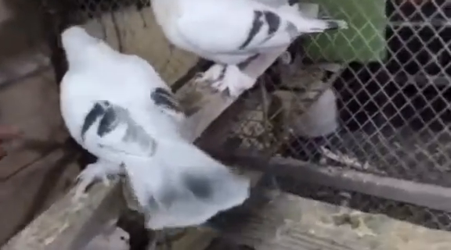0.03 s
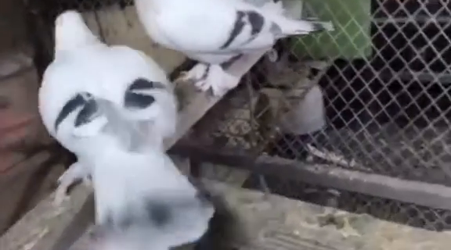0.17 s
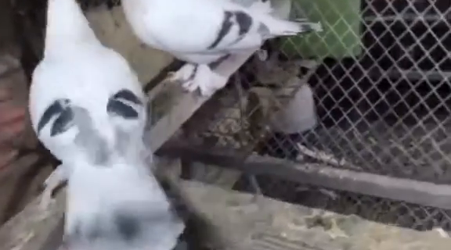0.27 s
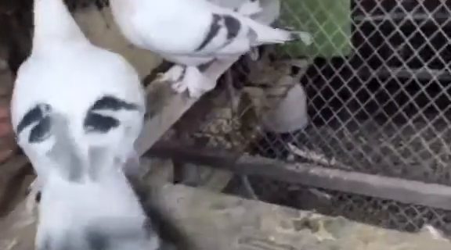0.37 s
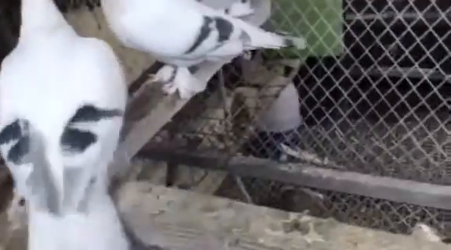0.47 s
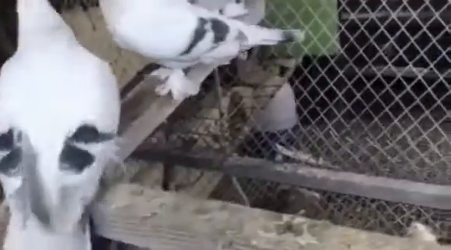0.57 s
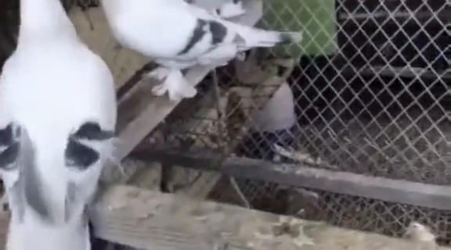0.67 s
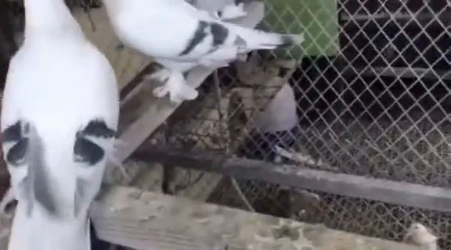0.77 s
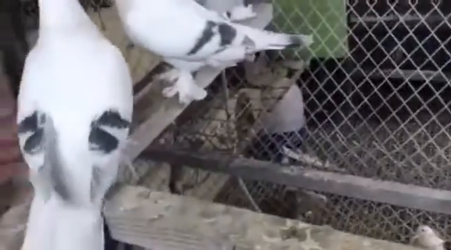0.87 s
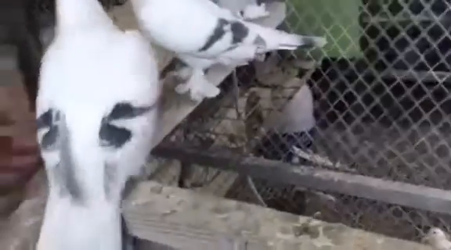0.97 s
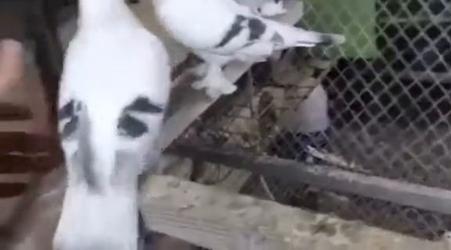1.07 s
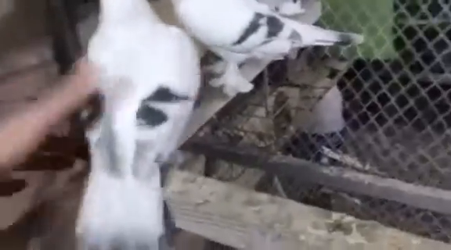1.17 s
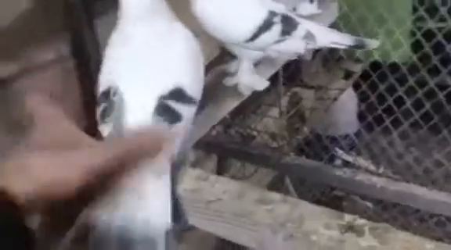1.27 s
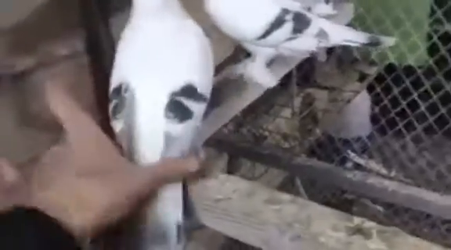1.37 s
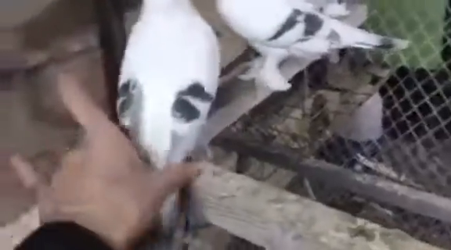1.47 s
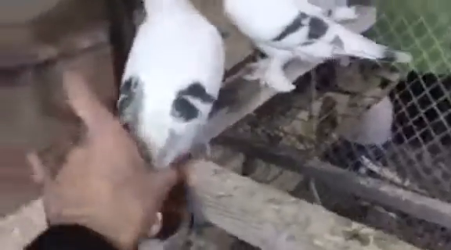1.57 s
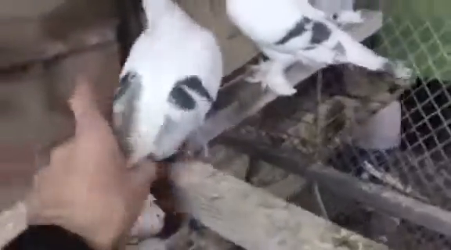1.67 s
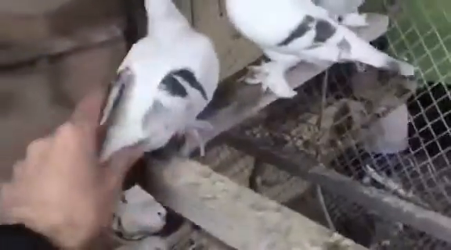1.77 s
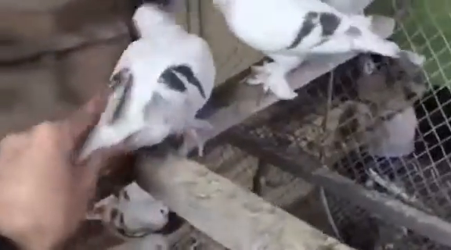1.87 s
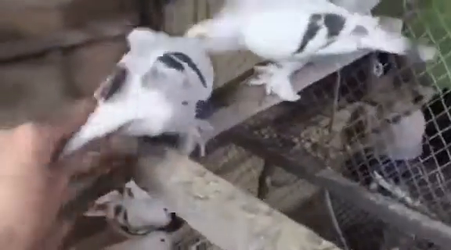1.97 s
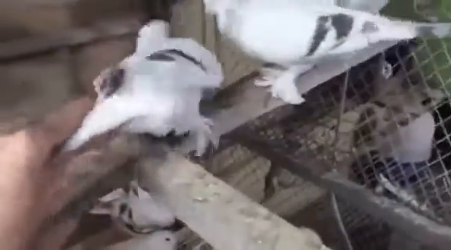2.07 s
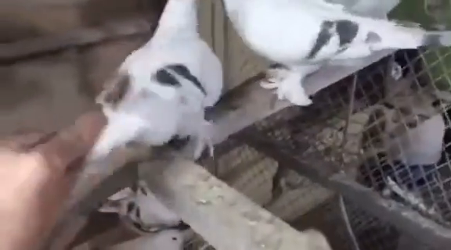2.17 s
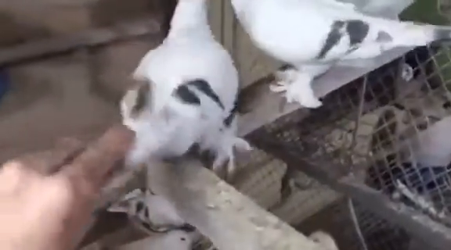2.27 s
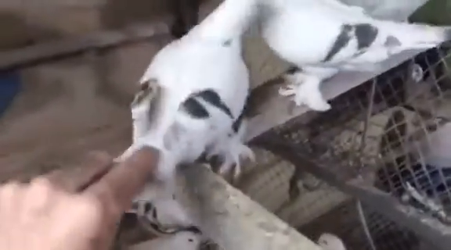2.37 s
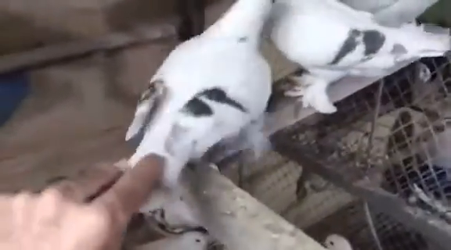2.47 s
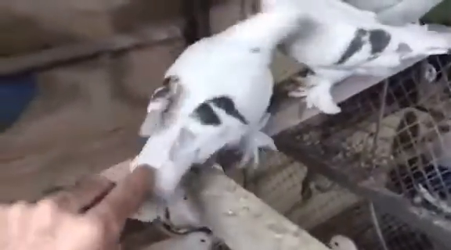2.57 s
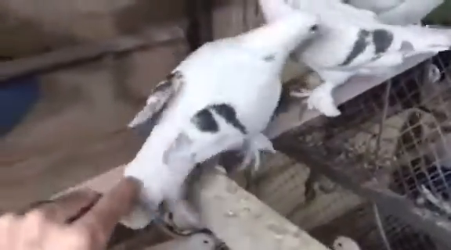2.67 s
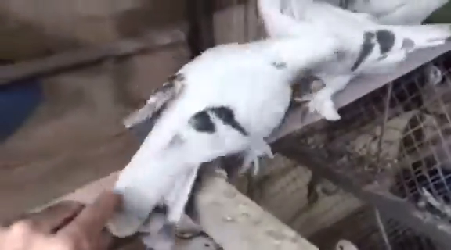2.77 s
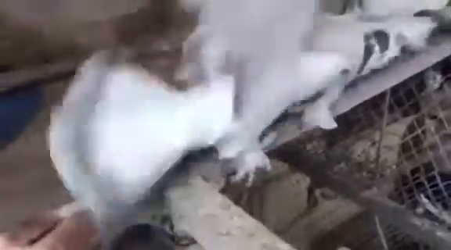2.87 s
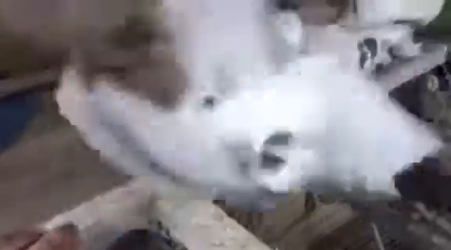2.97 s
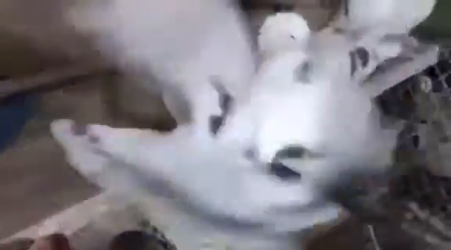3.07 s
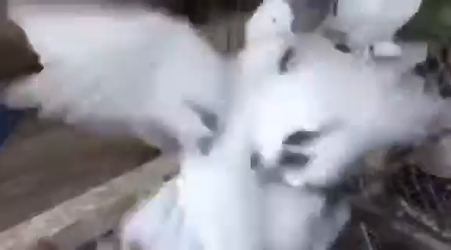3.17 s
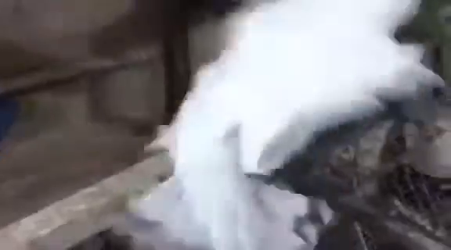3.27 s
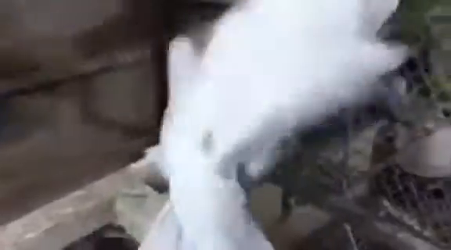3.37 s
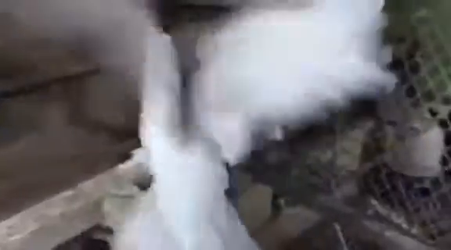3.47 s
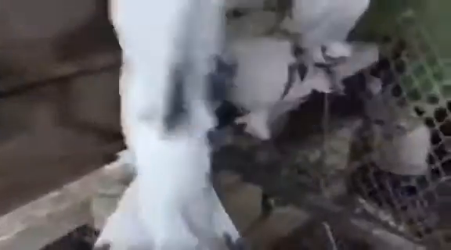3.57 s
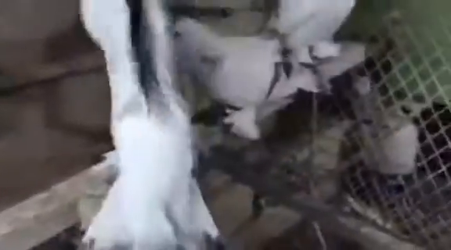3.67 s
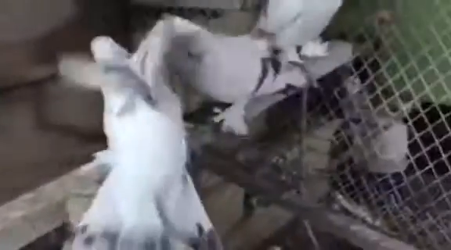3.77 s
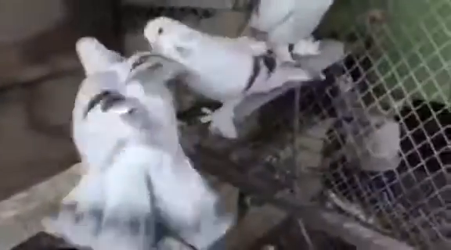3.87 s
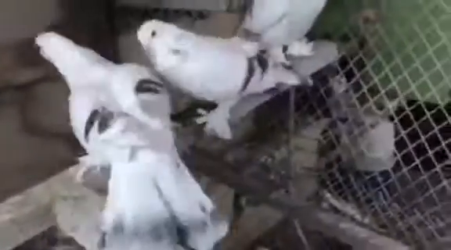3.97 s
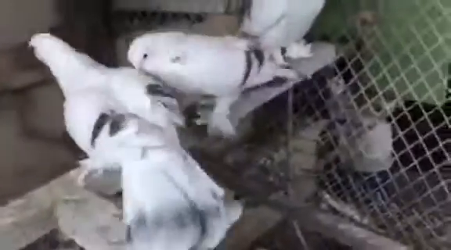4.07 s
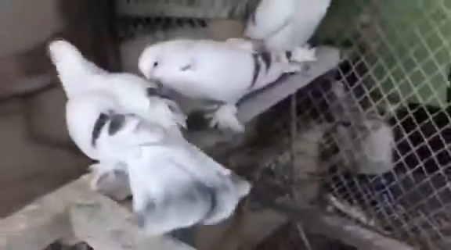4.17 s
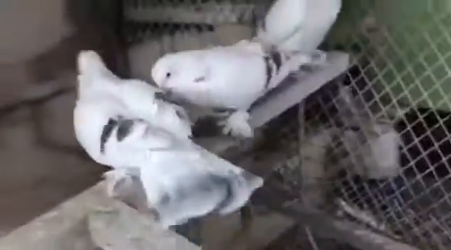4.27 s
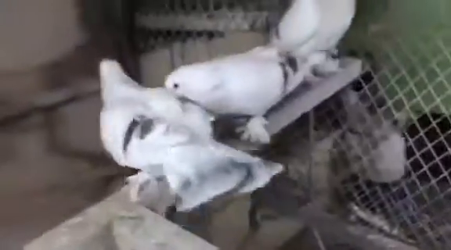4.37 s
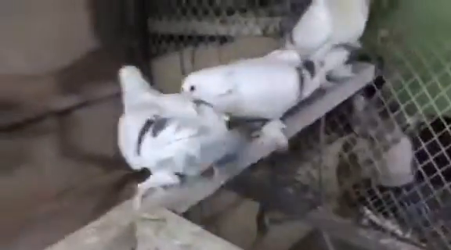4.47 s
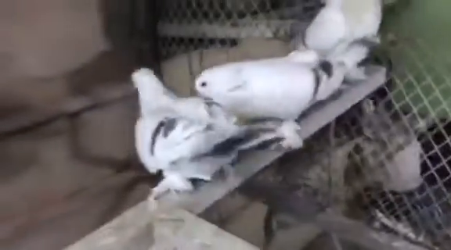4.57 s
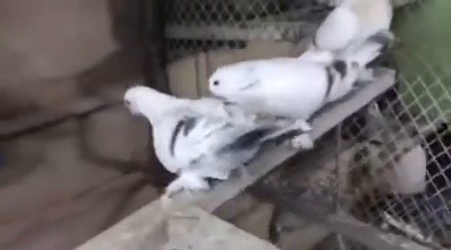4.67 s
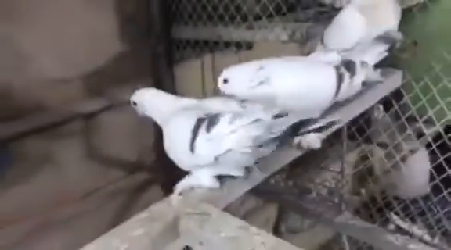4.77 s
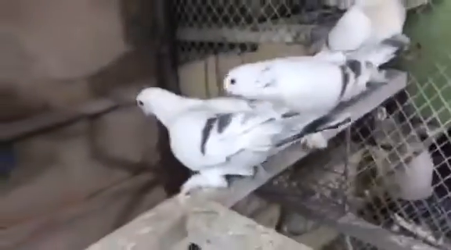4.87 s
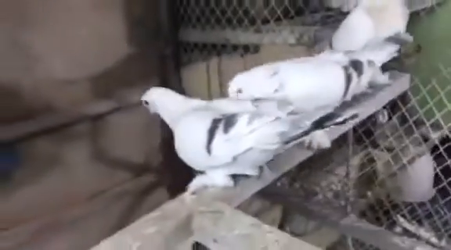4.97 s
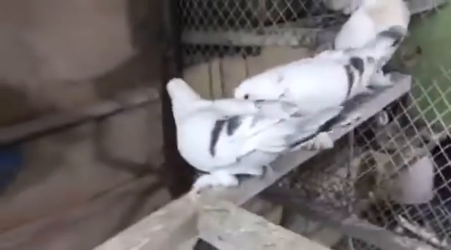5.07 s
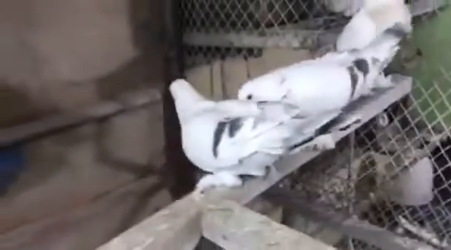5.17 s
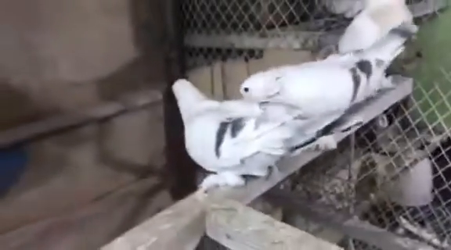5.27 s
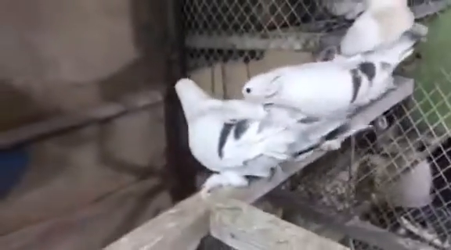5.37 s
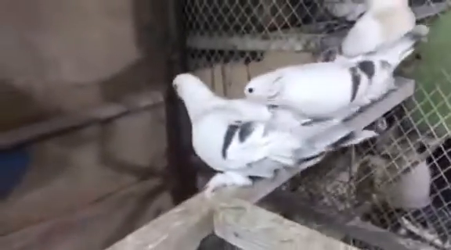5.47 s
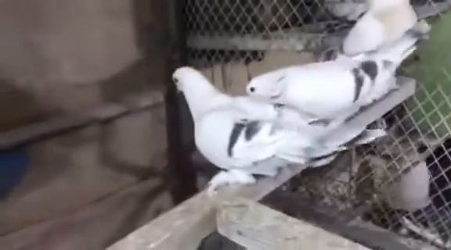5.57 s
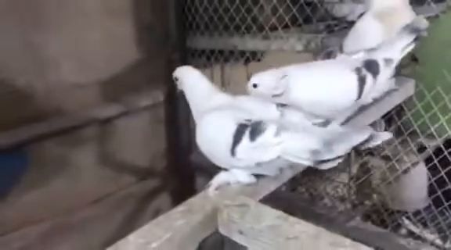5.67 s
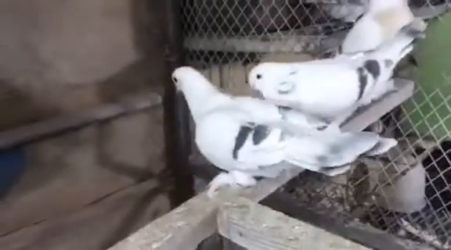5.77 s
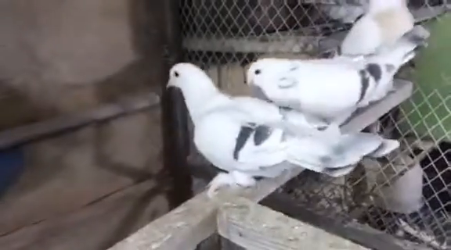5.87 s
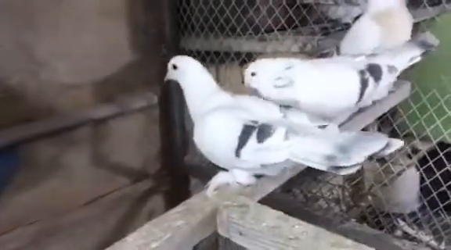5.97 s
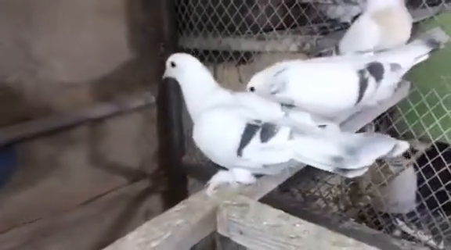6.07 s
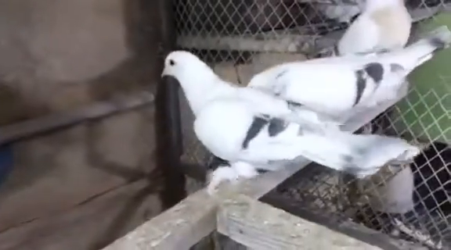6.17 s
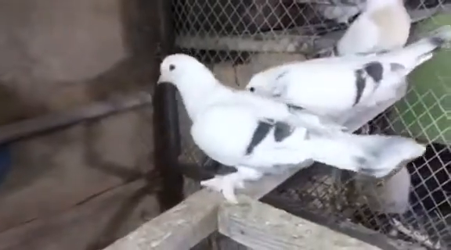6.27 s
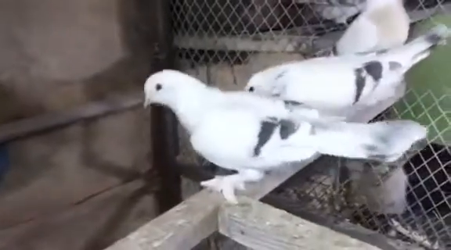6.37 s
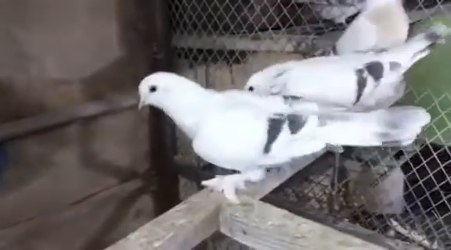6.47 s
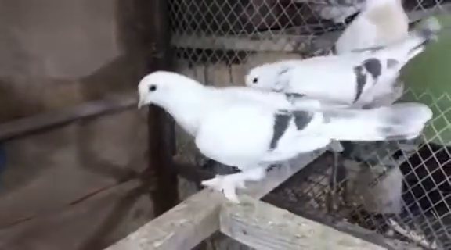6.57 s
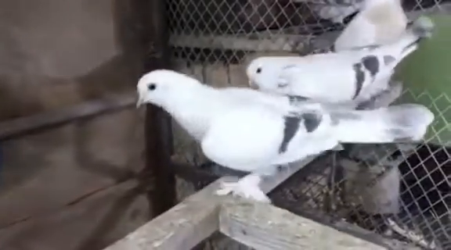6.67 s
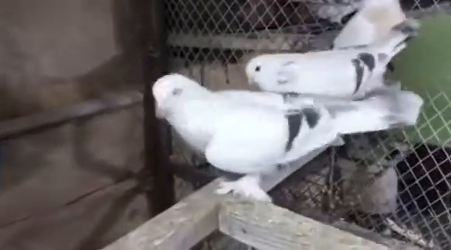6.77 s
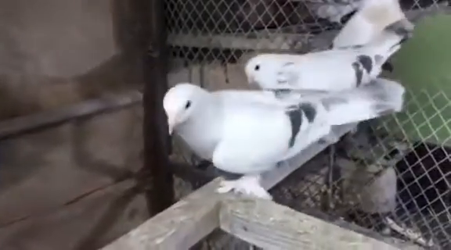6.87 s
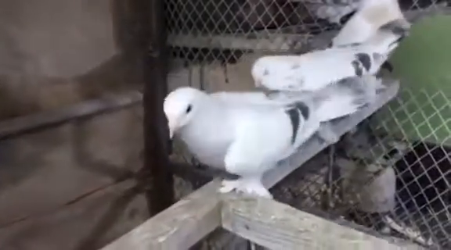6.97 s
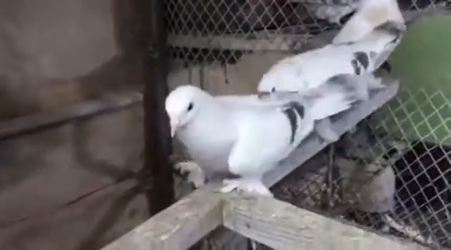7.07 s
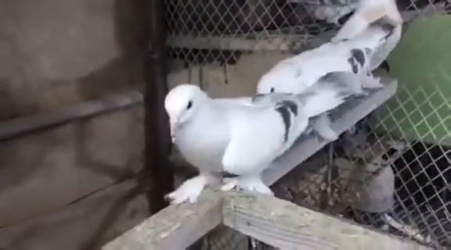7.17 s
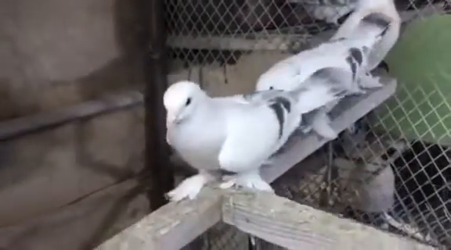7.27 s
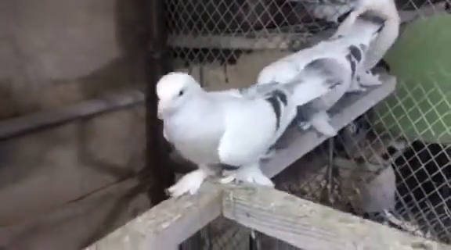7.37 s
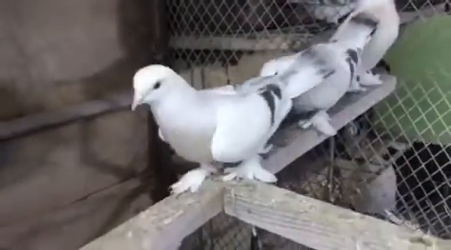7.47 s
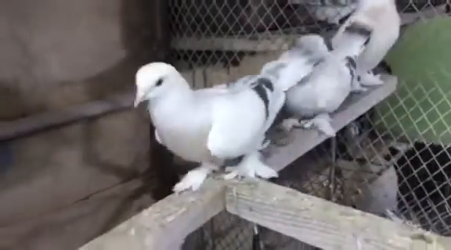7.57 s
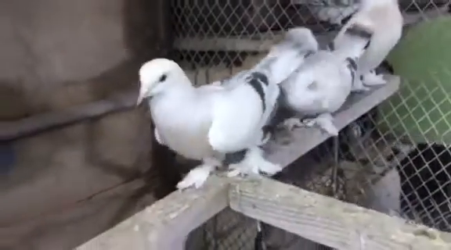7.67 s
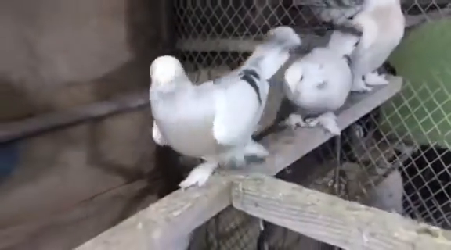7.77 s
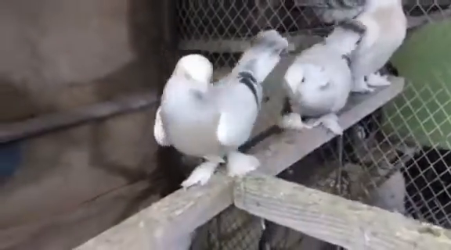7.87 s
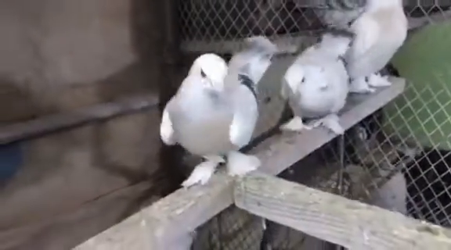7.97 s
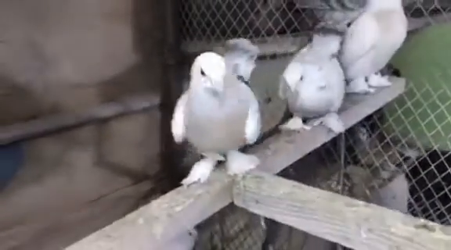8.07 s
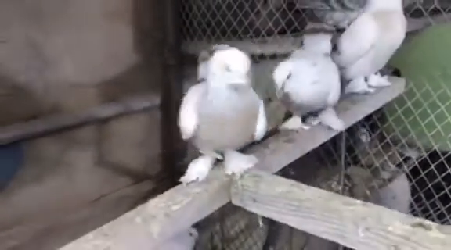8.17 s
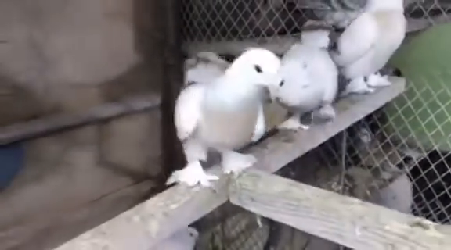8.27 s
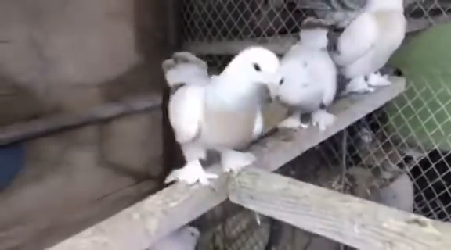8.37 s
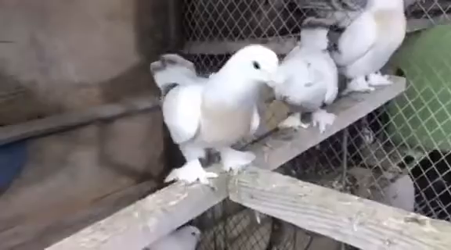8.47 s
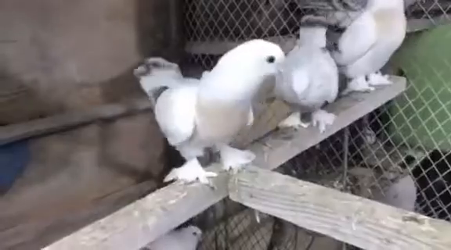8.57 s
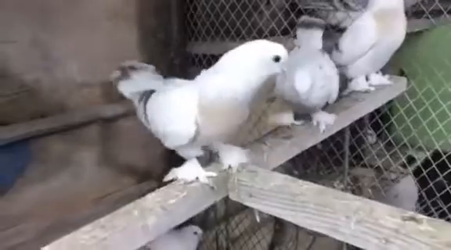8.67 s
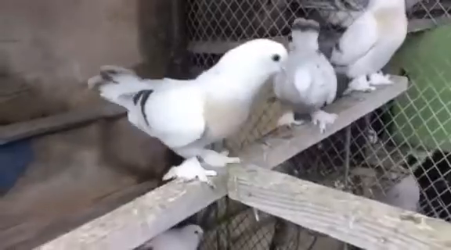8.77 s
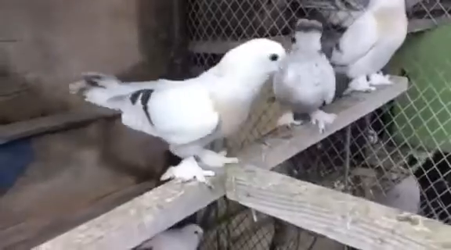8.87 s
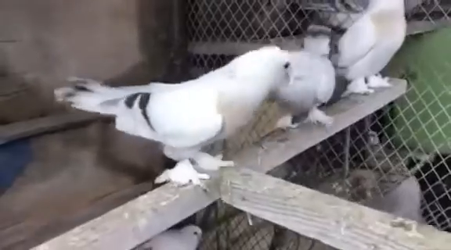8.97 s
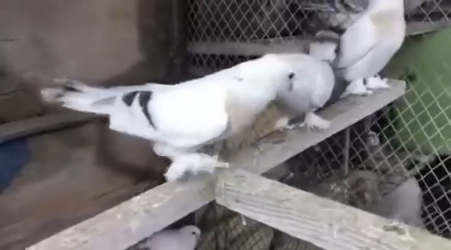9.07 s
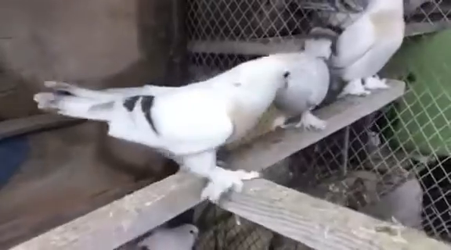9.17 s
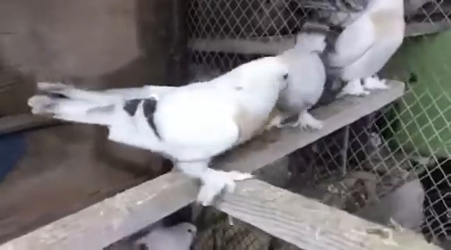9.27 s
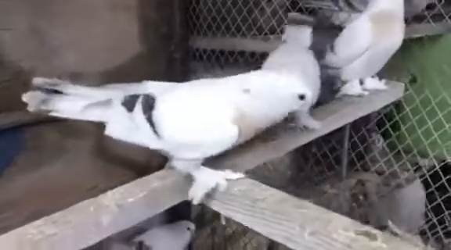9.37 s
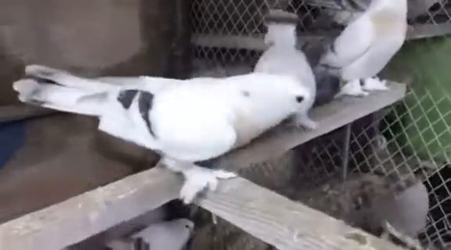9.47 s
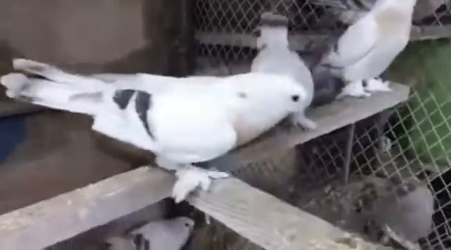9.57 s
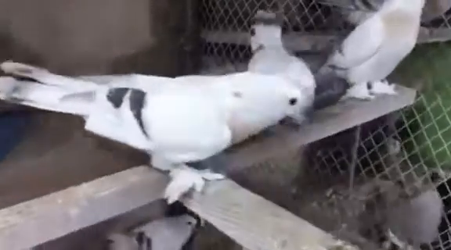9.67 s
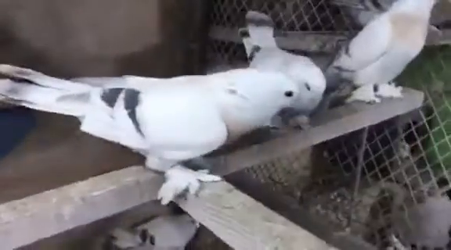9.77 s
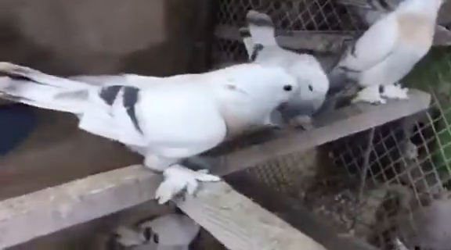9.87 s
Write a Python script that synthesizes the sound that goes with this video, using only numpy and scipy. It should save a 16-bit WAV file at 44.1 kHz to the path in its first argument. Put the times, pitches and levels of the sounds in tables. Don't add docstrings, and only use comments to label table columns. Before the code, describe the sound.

Close phone pickup of pigeons on wooden perches. A quiet start has soft feather hiss, dry scrapes, distant low throbbing motors and a thin insect buzz. Then come five rapid, dominating wing claps, the last much weaker. Afterwards there are small claw taps, bubbling low throat pops, brief closed-beak hoots and short rattling gasps, with a faint flock cooing behind and a short boxy loft reflection.

```python
import sys
import numpy as np
from scipy import signal
from scipy.fft import rfft, irfft
from scipy.io import wavfile
from scipy.ndimage import uniform_filter1d

SR = 44100
rng = np.random.default_rng(int(sys.argv[2]) if len(sys.argv) > 2 else 0)


def materialize(psi):
    bounded = np.clip(np.atleast_2d(psi).T, -1, 1)
    quanta = np.round(bounded * 32767).astype(np.int16)
    wavfile.write(sys.argv[1], SR, quanta)


def to_linear_factor(level_db):
    exponent = np.asarray(level_db, float) / 20
    return 10 ** exponent


N = 437913
TIME = np.arange(N) / SR

# pitch_hz, level_db
AIR_COLOUR = [(25, -14), (50, -10.5), (90, -4.5), (131, -11), (284, -7), (458, -15.5), (879, -15),
              (1400, -22), (2220, -35), (4160, -46), (7590, -56.5), (8900, -46), (9500, -73.5)]
AIR_DB = -48.5
# [(multiple, level_db)]
MOTORS = [
    (12.86, [(8, -73.5), (16, -68), (17, -67), (18, -64), (20, -65.5), (21, -63), (23, -73), (24, -63.5), (26, -66), (28, -65.5)]),
    (12.915, [(4, -60), (16, -59.5), (18, -60.5)]),
    (41.07, [(2, -56.5), (3, -73.5), (4, -69.5)]),
    (78.84, [(2, -60.5)]),
]
BEAT_HZ = 77.41, 78.84
BEAT_DB, BEAT_LOUDEST_S = (-52, -48), 0.75
THROB_HZ = 282.9, 284.33
THROB_DB, THROB_LOUDEST_S = (-64.5, -60.5), 0.6
# middle_s, half_length_s, level_db
LOW_BOUTS = [(1.35, 0.73, -64.5), (7.3, 0.98, -78.5)]
# middle_s, half_length_s, level_db
HIGH_BOUTS = [(0.351, 0.11, -75.5), (5.3, 0.78, -83.5)]
LOW_DRONE_DB, HIGH_DRONE_DB = -73, -80.5
# pitch_hz, level_db
HIGH_LINES = [(6540, 1), (5910, -6.5), (5660, -7)]
FLOCK_START_S, FLOCK_PER_S, FLOCK_DB, FLOCK_HZ, FLOCK_MS = 4.15, 45, -54, 330, 50.7

# time_s, level_db
STIRRING = [(0.0, -65), (0.298, -68), (0.9, -64), (1.66, -65), (2.03, -62.5), (2.25, -66), (2.7, -62.5),
            (2.789, -49), (3.121, -52), (3.45, -56.5), (4.051, -63), (4.88, -68), (7.46, -66), (7.68, -64),
            (8.632, -68), (9.93, -66.5)]
# pitch_hz, level_db
RUSTLE_COLOUR = [(470, -53.5), (800, -2.5), (3950, -4), (4770, -9), (5480, -4.5), (8900, -11),
                 (9590, -24.5), (10000, -84)]
# middle_s, level_db, centre_hz, length_s
SWISHES = [(0.425, -47.5, 1940, 0.009), (0.436, -60.5, 4200, 0.054), (1.2, -59, 4500, 0.012),
           (4.36, -59, 2580, 0.04), (4.345, -55.5, 7200, .012), (4.318, -62.5, 5500, .02),
           (4.408, -60.5, 6600, .008), (7.9, -60.5, 5000, .025), (7.7, -62, 9000, 0.011),
           (4.363, -64.5, 7600, 0.06), (4.388, -63, 5600, 0.055), (1.225, -57.5, 5500, 0.037),
           (1.508, -67, 6700, 0.072), (1.5, -64, 3150, 0.083), (1.8, -58, 5330, 0.047),
           (2.759, -56.5, 4000, 0.073), (2.811, -42.5, 6600, 0.035), (2.824, -55, 3970, 0.015),
           (2.883, -49, 5120, 0.034), (3.13, -53, 4450, 0.072), (3.22, -51, 5130, 0.065),
           (3.72, -59.5, 5340, 0.12), (3.788, -56, 3290, 0.05), (3.791, -53, 5670, 0.048),
           (3.8, -63.5, 5230, 0.044), (4.032, -60, 5420, 0.044), (4.425, -63.5, 6300, 0.065),
           (5.408, -64, 5700, 0.026), (6.86, -55, 3020, 0.017), (6.858, -60.5, 7500, .012),
           (8.2, -61, 2800, .008), (7.803, -69, 4990, 0.07), (9.016, -63, 6560, 0.04),
           (9.437, -63.5, 8140, 0.058)]
# start_s, peak_db, centre_hz, scrape_t60_s
SCRAPES = [(0.3686, -40, 5860, 0.092), (0.4014, -31.5, 3090, 0.28), (0.5067, -41.5, 4480, 0.17),
           (0.5844, -42, 8310, 0.097), (0.8802, -34, 8500, 0.11), (1.3443, -46.5, 4700, 0.058),
           (1.5, -47, 3140, 0.14), (1.8764, -45.5, 5000, 0.11), (2.1288, -36.5, 6050, 0.19),
           (2.171, -38, 2540, 0.26), (2.4109, -32.5, 5340, 0.13), (2.4708, -38.5, 2570, 0.17),
           (2.5983, -41, 4740, 0.2), (3.775, -38.5, 6320, 0.21), (4.308, -41.5, 2670, 0.15),
           (4.4173, -43, 5250, 0.19), (8.6101, -39.5, 3450, 0.19), (8.6997, -41.5, 8430, 0.11),
           (8.764, -49.5, 7500, .1), (9.5991, -38, 6150, 0.15)]
# start_s, peak_db, centre_hz
TAPS = [(3.525, -40, 4550), (3.5374, -37, 4530), (3.577, -37.5, 4220), (4.0031, -48.5, 5570),
        (4.209, -41, 5300), (4.3368, -32.5, 7570), (4.33, -40, 7000), (4.487, -44, 5310),
        (4.7554, -45.5, 2260), (4.951, -39.5, 5480), (5.4563, -45, 5400), (6.1609, -38.5, 3250),
        (6.554, -35.5, 5460), (6.7477, -41, 3280), (6.8052, -48.5, 5600), (7.0277, -46.5, 6470),
        (7.0633, -44.5, 8150), (7.348, -44.5, 6540), (7.5471, -43, 6230), (7.6774, -47.5, 2840),
        (7.792, -41, 6900), (7.8245, -39, 4580), (8.26, -48, 3220), (8.886, -45, 6280), (8.9304, -42, 2590),
        (9.1013, -47, 6040), (9.634, -51.5, 6530), (9.9255, -39.5, 8500), (9.3462, -38.5, 5290),
        (9.556, -43.5, 6700)]
TAP_T60_S = 0.073
# start_s, peak_db, pitch_hz
PINGS = [(0.4014, -33.5, 3960), (0.4003, -39, 8250), (.418, -41, 1930), (.584, -49.5, 3880),
         (0.882, -44.5, 4030), (0.8793, -41.5, 6750), (2.767, -46, 1580), (2.8, -39.5, 5450),
         (2.807, -45, 2240), (2.812, -37, 3820), (2.8146, -32.5, 5430), (2.8763, -49, 5400),
         (2.884, -46, 5400), (2.901, -41, 1780), (4.194, -53, 5380), (4.212, -46, 5400),
         (4.33, -49.5, 5500), (4.3372, -41, 7000), (4.337, -37, 8300), (4.952, -45.5, 5250),
         (5.457, -52, 5800), (6.749, -53.5, 8600), (6.75, -51, 2150), (8.611, -53, 3500),
         (8.6989, -44.5, 4550), (8.6992, -48, 6050), (8.71, -52.5, 4600), (8.887, -52.5, 3450),
         (8.93, -50.5, 7800), (4.338, -44, 2600), (4.364, -49.5, 2600), (4.416, -53.5, 5260),
         (4.423, -51, 3540), (6.749, -48.5, 6230), (6.806, -51.5, 5800), (6.846, -48.5, 2750),
         (6.856, -48.5, 3600), (6.859, -47.5, 2420), (7.064, -52.5, 5880), (8.9304, -53.5, 2700),
         (8.93, -51.5, 4200), (8.9309, -49, 6100)]
PING_T60_S, PING_PARTNER_RATIO, PING_PARTNER_DB = 0.024, 0.92, -4.5

# start_s, length_s, level_db, throat_first_hz, throat_last_hz
GASPS = [(4.747, 0.079, -48.5, 1020, 1000), (5.1, 0.058, -46, 980, 1060), (5.724, .175, -42.5, 952, 1110),
         (6.136, 0.052, -48, 1006, 960), (6.753, 0.094, -44, 870, 1010), (7.179, 0.057, -44.5, 907, 1030),
         (7.776, 0.055, -44.5, 820, 910), (8.069, .075, -42.5, 920, 1220), (8.38, 0.055, -41, 885, 1060),
         (9.012, .075, -47, 850, 950)]
# first_hz, last_hz
GASP_RATES = [(119, 112), (116.7, 100), (119.8, 114), (116, 116), (113.6, 140), (112.2, 119), (115.6, 117),
              (110, 124), (107.4, 122), (115.7, 116)]
GASP_RISE_S, GASP_HELD_PART = 0.032, 0.53
GASP_START_DB, GASP_HELD_DB, GASP_END_DB = -7.5, -5, -17
GASP_WIDTH_HZ, GASP_CHEST_HZ, GASP_CHEST_DB = 235, 640, -11.5
# start_s, length_s, level_db, first_hz, last_hz
LOW_HOOTS = [(4.297, .04, -49, 335, 344), (4.392, .035, -49.5, 385, 403), (4.579, 0.083, -49, 343, 307),
             (5.66, 0.06, -51, 212, 232), (7.103, .06, -51, 263, 284), (7.327, 0.033, -45, 308, 373),
             (9.201, .11, -53, 326, 283), (5.389, 0.067, -51, 404, 420), (5.484, 0.073, -47, 312, 380),
             (5.55, 0.022, -40, 390, 315), (5.585, 0.055, -54, 442, 395), (5.635, 0.03, -42.5, 378, 380),
             (6.412, 0.13, -49, 403, 413), (6.542, 0.028, -45.5, 427, 344), (6.745, 0.088, -50, 362, 330),
             (6.594, 0.13, -52, 428, 485), (6.975, 0.078, -52, 309, 286), (7.467, 0.081, -49.5, 411, 404),
             (7.562, .04, -49.5, 425, 363), (7.625, 0.11, -49.5, 224, 251), (8.33, 0.13, -56, 372, 397),
             (8.811, 0.031, -41.5, 350, 245), (8.884, 0.06, -46.5, 218, 223), (9.363, .12, -43, 271, 353.5),
             (9.511, 0.072, -46.5, 345, 312), (9.849, 0.08, -49, 450, 429), (9.86, 0.041, -43.5, 208, 216)]
# start_s, length_s, level_db, first_hz, last_hz
HIGH_HOOTS = [(5.566, 0.052, -48, 687, 590), (5.66, 0.036, -48, 696, 632), (6.581, 0.055, -43, 577, 685),
              (7.122, 0.019, -48.5, 660, 627), (7.364, 0.038, -45.5, 620, 621),
              (7.444, 0.039, -56, 613, 635), (7.61, 0.062, -50.5, 633, 691), (8.627, .025, -53, 630, 605),
              (6.384, 0.045, -50.5, 638, 620), (7.662, 0.05, -51.5, 743, 780), (7.665, .065, -51, 510, 519),
              (8.545, 0.041, -48, 577, 610), (8.824, 0.094, -49.5, 620, 660), (9.388, .05, -45, 642, 547),
              (9.502, 0.064, -50, 512, 575), (9.559, 0.04, -46, 590, 600), (9.611, 0.073, -45, 640, 551),
              (9.715, 0.14, -50, 520, 509), (9.868, 0.071, -53, 670, 680), (7.618, 0.04, -53.5, 876, 900)]
HOOT_RISE_S, HOOT_FALL_S = 0.0038, 0.0098
# start_s, peak_db, pitch_hz, octave_db
GRUMBLES = [(4.194, -40, 323, -9.5), (4.275, -34, 292, -8), (4.352, -41, 294, 0), (4.429, -34, 309, -9.5),
            (4.519, -38.5, 315, -8), (4.679, -39, 345, -11.5)]
# start_s, peak_db, pitch_hz, octave_db
POPS = [(5.222, -34.5, 319, -4.5), (5.272, -40.5, 298.5, -13), (5.338, -34, 324, -5),
        (5.452, -36, 333, -2.5), (5.909, -41.5, 302, -14), (6.259, -36.5, 321, -3), (6.318, -41, 307, -1.5),
        (6.373, -31.5, 305, -2.5), (6.567, -34, 330, -8.5), (6.948, -38, 341, -19.5), (7.316, -34, 309, -3),
        (7.358, -50.5, 323, -8), (7.427, -30.5, 321, -3.5), (7.6, -35, 342, -14),
        (8.469, -38.5, 373, -20.5), (8.51, -32.5, 308.5, -3.5), (8.613, -32, 314, -3),
        (8.808, -35.5, 334, -8.5), (8.931, -42, 276, -6.5), (9.02, -41.5, 336, -15),
        (9.353, -33.5, 256, -13.5), (9.477, -32.5, 303, -7), (9.55, -35, 284, -0.5), (9.594, -41, 295, 1),
        (9.662, -32.5, 327, -4.5), (9.83, -32, 330, -12.5)]
POP_MS, POP_MS_PER_DB, THIRD_DB, THIRD_PER_DB = 15.8, 1.1, -8, 1.5
GRUMBLE_THIRD_DB = 9.5

# start_s, peak_db, thump_db, gust_db
CLAPS = [
    (2.945, -7.5, -10, -29),
    (3.0569, -8, -14, -23.5),
    (3.1668, -7.5, -13, -26.5),
    (3.2792, -4.5, -12, -22),
    (3.4081, -16, -23.5, -41),
]
# lag_ms, level_db, air_pocket_hz
SECOND_WINGS = [(0.13, -11, 895), (2.6, 2.5, 930), (0.7, -1, 780), (2.25, -9.5, 905), (0.13, 0, 700)]
# pitch_hz, level_db
SHAFTS = [
    [(4460, -20.5), (1220, -18.5), (1890, -14), (2550, -21), (3700, -23), (6110, -19)],
    [(6230, -22), (8800, -20), (595, -26.5), (1117, -19.5), (1540, -20.5), (2430, -17.5), (2940, -19)],
    [(3770, -13), (420, -24), (1580, -17), (5440, -17.5), (7340, -18.5), (4340, -22)],
    [(3570, -15), (380, -22.5), (1650, -15.5), (2820, -20.5), (4200, -14), (5270, -22)],
    [(4200, -17), (1310, -18.5), (3280, -20), (5900, -17), (6360, -16), (8380, -16.5)],
]
SHAFT_T60_S, GUST_T60_S = 0.02, 0.1
# pitch_hz, level_db
CLAP_COLOUR = [(500, -26.5), (1300, -11), (2300, -0.5), (3800, -3), (4600, -4), (8670, -3.5), (9310, -10.5),
               (10500, -27.5)]
FULL_THUMP_DB, SPREAD_MS, SPREAD_PER_DB = -11.5, 0.75, 6.5
# pitch_hz, threshold_db over the usual level
GATE = [(2500, -8.5), (5000, -4.5), (7400, 3), (8600, -0.5), (9300, 7)]


def level(x, db):
    return x * to_linear_factor(db) / np.sqrt(np.mean(x ** 2))


def peak(x, db):
    return x * to_linear_factor(db) / np.abs(x).max()


def colour(x, points):
    hz, db = np.transpose(points)
    bins = np.arange(len(x) // 2 + 1) * SR / len(x) + 1
    return irfft(rfft(x) * to_linear_factor(np.interp(np.log(bins), np.log(hz), db)), len(x))


def band(x, hz, width_hz):
    return signal.lfilter(*signal.iirpeak(hz, hz / width_hz, fs=SR), x)


def walk(rate):
    hold = int(SR / rate)
    steps = np.repeat(rng.standard_normal(N // hold + 1), hold)
    return 0.87 * uniform_filter1d(uniform_filter1d(steps, hold), hold)[:N]


def fade(s, t60):
    return np.exp(-np.log(1000) * s / t60)


def sine(hz):
    return np.sin(2 * np.pi * np.cumsum(hz) / SR)


def add(out, start, x):
    i = int(start * SR)
    out[i:i + len(x)] += x[:N - i]


def played(length, rise_s, fall_s):
    s = np.arange(0, length, 1 / SR)
    edge = np.clip(np.minimum(s / rise_s, (length - s) / fall_s), 0, 1)
    return s / length, edge


def air():
    noise, out = colour(rng.standard_normal(N), AIR_COLOUR), 0
    for hz in 30 * 2. ** np.arange(9):
        octave = colour(noise, [(hz / 2, -40), (hz / 1.3, -3), (hz, 0), (hz * 1.3, -3), (hz * 2, -40)])
        out = out + octave * to_linear_factor(0.44 * walk(15.0) + 0.25 * walk(0.17))
    return level(out, AIR_DB)


def beating(tones_hz, tones_db, loudest_s, sway_db, sway_rate):
    out = 0
    for hz, db in zip(tones_hz, tones_db):
        out = out + to_linear_factor(db + sway_db * walk(sway_rate)) * np.sin(2 * np.pi * hz * (TIME - loudest_s))
    return out


def machines():
    out = beating(BEAT_HZ, BEAT_DB, BEAT_LOUDEST_S, 1.3, 3.5)
    out = out + beating(THROB_HZ, THROB_DB, THROB_LOUDEST_S, 1.4, 5.9)
    for shaft_hz, harmonics in MOTORS:
        for multiple, db in harmonics:
            tone = np.sin(2 * np.pi * (multiple * shaft_hz * TIME + rng.random()))
            out = out + to_linear_factor(db + 3.1 * walk(2.15)) * tone
    return np.sqrt(2) * out


def bouts(drone_db, rows):
    return to_linear_factor(drone_db) + sum(to_linear_factor(db) * np.exp(-((TIME - s) / half) ** 2) for s, half, db in rows)


def insects():
    noise = rng.standard_normal((2, N))
    core = sine(4740 + 45 * walk(1.5) + 25 * walk(60)) * to_linear_factor(3.0 * walk(6))
    buzz = level(band(band(noise[0], 4730, 420), 4730, 420), 0)
    low = (buzz + to_linear_factor(-3.5) * core) * to_linear_factor(2.0 * walk(40))
    high = sum(to_linear_factor(db) * band(band(noise[1], hz, 22), hz, 22) for hz, db in HIGH_LINES)
    low_song = level(low, -4.5) * bouts(LOW_DRONE_DB, LOW_BOUTS)
    return low_song + level(high, -1.2) * bouts(HIGH_DRONE_DB, HIGH_BOUTS)


def flock():
    out, u = np.zeros(N), np.linspace(0, 1, int(FLOCK_MS / 1000 * SR))
    for k, (wait, tune, glide, size) in enumerate(rng.standard_normal((600, 4))):
        start = FLOCK_START_S + (k + wait) / FLOCK_PER_S
        hz = FLOCK_HZ * np.exp(0.1575 * np.clip(tune, -1.5, 1.2) + 0.13 * glide * u)
        phase = 2 * np.pi * np.cumsum(hz) / SR
        tone = to_linear_factor(1.5) * np.sin(phase) + to_linear_factor(-2.5) * np.sin(2 * phase) + to_linear_factor(-8) * np.sin(3 * phase)
        if start < N / SR:
            add(out, start, to_linear_factor(FLOCK_DB + 3.1 * min(size, 0.6)) * np.sin(np.pi * u) ** 2 * tone)
    return out


def rustle():
    s, db = np.transpose(STIRRING)
    flicker_db = 2 * walk(30) + 2.5 * walk(300)
    hiss = colour(rng.standard_normal(N), RUSTLE_COLOUR) * to_linear_factor(flicker_db)
    return level(hiss, -0.9) * to_linear_factor(np.interp(TIME, s, db))


def swishes():
    out = np.zeros(N)
    for middle, db, hz, length in SWISHES:
        u = np.linspace(-2, 2, int(2 * length * SR))
        noise, grit = rng.standard_normal((2, SR // 4))[:, :len(u)]
        grit_db = 2.0 * np.repeat(grit, 120)[:len(u)]
        barbs = band(noise * to_linear_factor(grit_db), hz, 0.18 * hz)
        add(out, middle - length, level(barbs, db) * np.exp(-u ** 2))
    return out


def ticks():
    out, s = np.zeros(N), np.arange(SR // 5) / SR
    for start, db, hz, t60 in SCRAPES + [(*tap, TAP_T60_S) for tap in TAPS]:
        noise, grit = rng.standard_normal((2, len(s)))
        slips = to_linear_factor(1.9 * np.repeat(grit, 80)[:len(s)])
        strength = fade(s, 0.014) + 0.35 * slips * fade(s, max(t60, 0.01))
        scrape = noise * np.clip(s / 0.0012, 0, 1) * strength
        wide = scrape - band(scrape, 500, 1300)
        add(out, start, peak(band(scrape, hz, 360) + 0.43 * wide, db))
    return out


def pings():
    out, s = np.zeros(N), np.arange(SR // 20) / SR
    for start, db, hz in PINGS:
        partner = np.sin(2 * np.pi * PING_PARTNER_RATIO * hz * s)
        pair = np.sin(2 * np.pi * hz * s) + to_linear_factor(PING_PARTNER_DB) * partner
        add(out, start, peak(pair * np.clip(s / 0.0005, 0, 1) * fade(s, PING_T60_S), db))
    return out


def gasps():
    out, s = np.zeros(N), np.arange(SR // 40) / SR
    swell = np.pi * GASP_WIDTH_HZ * s
    ring_shape = swell * np.exp(1 - swell)
    chest = to_linear_factor(GASP_CHEST_DB) * np.sin(2 * np.pi * GASP_CHEST_HZ * s) * ring_shape
    contour_db = [GASP_START_DB, 0, GASP_HELD_DB, GASP_END_DB]
    for (start, length, top_db, first_hz, last_hz), rates in zip(GASPS, GASP_RATES):
        u, edge = played(length, 0.0067, 0.007)
        db = top_db + np.interp(u, [0, GASP_RISE_S / length, GASP_HELD_PART, 1], contour_db)
        hz = first_hz + (last_hz - first_hz) * u
        chance = rng.standard_normal((40, 3))
        rate = np.interp(np.arange(40) / np.mean(rates) / length, [0, 1], rates)
        beats = np.cumsum(SR / rate * (1 + 0.018 * chance[:, 0])).astype(int)
        for i, (_, size, tune) in zip(beats[beats < len(db)], chance):
            throat = np.sin(2 * np.pi * hz[i] * (1 + 0.015 * tune) * s) * ring_shape
            add(out, start + i / SR, edge[i] * to_linear_factor(db[i] + 10 + 1.8 * size) * (throat + chest))
    return out


def hoots():
    out, waver, flutter = np.zeros(N), walk(40), walk(35) + 0.7 * walk(110)
    for start, length, db, first_hz, last_hz in LOW_HOOTS + HIGH_HOOTS:
        u, edge = played(length, HOOT_RISE_S, HOOT_FALL_S)
        hz = first_hz + (last_hz - first_hz) * np.sin(u * np.pi / 2)
        part = np.minimum(int(start * SR) + np.arange(len(hz)), N - 1)
        tone = sine(hz * (1 + 0.022 * waver[part]))
        add(out, start, np.sqrt(2) * edge * to_linear_factor(db + 1.8 * flutter[part]) * tone)
    return out


def pops():
    out = np.zeros(N)
    calls = [(*p, GRUMBLE_THIRD_DB) for p in GRUMBLES] + [(*p, 0) for p in POPS]
    for start, db, hz, octave_db, open_db in calls:
        ms = POP_MS - POP_MS_PER_DB * octave_db
        third_db = THIRD_DB + open_db + THIRD_PER_DB * octave_db
        u = np.linspace(0, 1, int(1.25 * ms / 1000 * SR))
        phase = 2 * np.pi * np.cumsum(hz * (1.03 - 0.081 * u)) / SR
        shape = u ** 2.55 * np.exp(-(u / 0.38) ** 2) / 0.032
        tone = np.cos(phase) + to_linear_factor(octave_db + 2.0) * np.cos(2 * phase + np.pi * u)
        tone += to_linear_factor(third_db + 3.0) * np.cos(3 * phase) * np.exp(-u / 0.95)
        tone *= 1 + 0.34 * np.cos(phase / 2)
        breath = band(rng.standard_normal(SR // 10), 810, 300)[-len(u):]
        add(out, start - 0.0045, to_linear_factor(db) * shape * (tone + to_linear_factor(octave_db - 8.5) * breath))
    return out


def quill_crack(noise, touch, bright_hz, spread, stagger, second_db):
    quills = colour(noise, CLAP_COLOUR)
    quills += 0.82 * band(quills, bright_hz, 2200)
    burst = np.exp(-((touch - 0.0012) / spread) ** 2)
    burst += to_linear_factor(second_db) * np.exp(-((touch - 0.0013 - stagger) / spread) ** 2)
    burst += to_linear_factor(second_db - 4.5) * (touch > 0.0012) * (touch < 0.0013 + 1.6 * stagger)
    brush = to_linear_factor(-20) * ((touch + 0.003) / 0.0028) ** 3 * (touch < 0)
    brush += to_linear_factor(-13) * fade(touch, 0.096) * (touch >= 0)
    return quills * (burst + brush)


def pocket_thump(noise, s, late, hz, stagger, second_db):
    thump = sine(hz * (1 + 0.33 * np.exp(-late / 0.0006)) * (late > 0)) * fade(late, 0.02)
    thump = thump + to_linear_factor(second_db + 3.0) * np.interp(s - stagger, s, thump)
    return thump + band(noise, hz, 450) * fade(late, 0.035) * 2.2 * (late > 0)


def wing_gust(late):
    swing = sine(50 + 340 * np.exp(-late / 0.0055))
    return swing * np.clip(late / 0.0043, 0, 1) * fade(late, GUST_T60_S)


def claps():
    out, s = np.zeros(N), np.arange(SR // 8) / SR
    touch = s - 0.003
    late = np.maximum(touch - 0.0011, 0)
    for clap, second_wing, rings in zip(CLAPS, SECOND_WINGS, SHAFTS):
        start, db, thump_db, gust_db = clap
        lag_ms, second_db, hz = second_wing
        stagger = lag_ms / 1000
        slack_db = np.clip(thump_db - FULL_THUMP_DB, -3, 0)
        spread = SPREAD_MS * to_linear_factor(SPREAD_PER_DB * slack_db) / 2000
        noise = rng.standard_normal((2, len(s)))
        crack = quill_crack(noise[0], touch, rings[0][0], spread, stagger, second_db)
        thump = pocket_thump(noise[1], s, late, hz, stagger, second_db)
        shafts = sum(to_linear_factor(ring_db) * np.sin(2 * np.pi * ring_hz * late) for ring_hz, ring_db in rings)
        sound = peak(crack, db - 2.0) + peak(thump, db + thump_db)
        sound += peak(wing_gust(late), db + gust_db) + to_linear_factor(db) * shafts * fade(late, SHAFT_T60_S)
        add(out, start - 0.003, sound)
    return out


def loft(x, t60, db):
    s = np.arange(SR // 3) / SR
    tail = colour(rng.standard_normal(len(s)), [(2000, -1.5), (9000, -6.5)])
    tail *= fade(s, t60) * np.clip(s / 0.0033, 0, 1)
    return x + to_linear_factor(db) * signal.fftconvolve(x, tail / np.sqrt(np.sum(tail ** 2)))[:N]


def scene():
    voices = loft(flock() + gasps() + hoots() + pops(), t60=0.37, db=-11)
    near = loft(swishes() + ticks() + pings() + claps(), t60=0.13, db=-13.0)
    return (air() + machines() + insects() + rustle() + voices + near)[None]


def band_limit(x):
    return signal.sosfilt(signal.butter(12, 10280, fs=SR, output="sos"), x)


def record(dry):
    cut = signal.sosfilt(signal.cheby1(12, 0.5, 9080, fs=SR, output="sos"), dry)
    hz, _, lines = signal.stft(cut, SR, nperseg=2048)
    power = uniform_filter1d(np.abs(lines) ** 2, size=2, axis=1)
    gate_hz, gate_db = np.transpose(GATE)
    threshold = np.median(power, axis=2) * to_linear_factor(2 * np.interp(hz, gate_hz, gate_db, left=-60))
    opening = np.clip(power / threshold[..., None], 0, 1) ** 3
    gated = signal.istft(lines * opening, SR, nperseg=2048)[1][:, :N]
    return band_limit(gated)


dry = scene()
out = record(dry)
materialize(out)
```